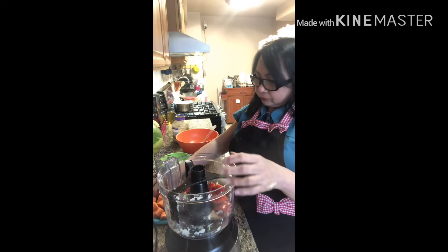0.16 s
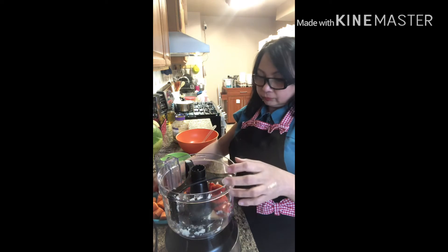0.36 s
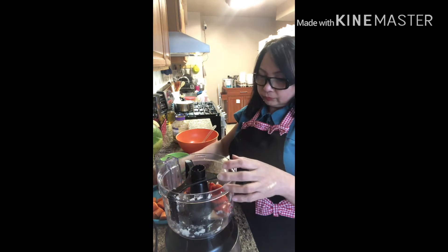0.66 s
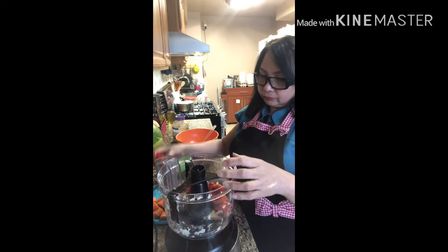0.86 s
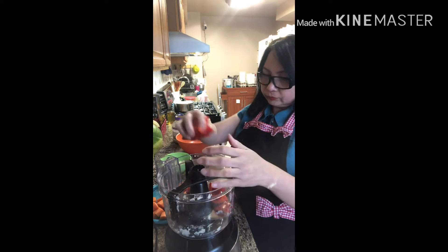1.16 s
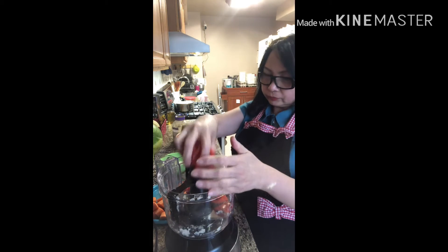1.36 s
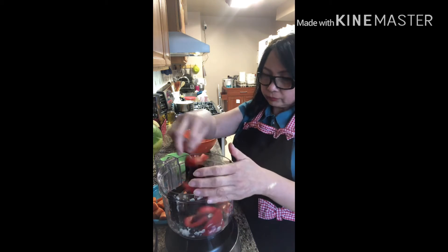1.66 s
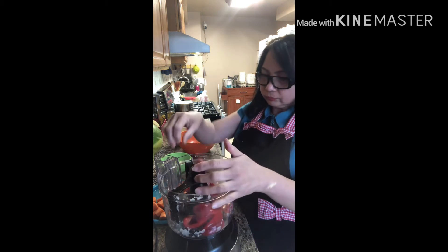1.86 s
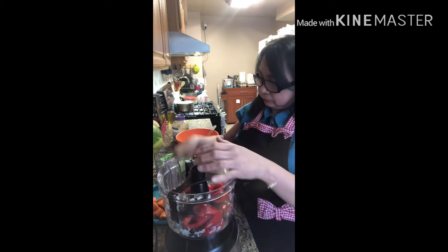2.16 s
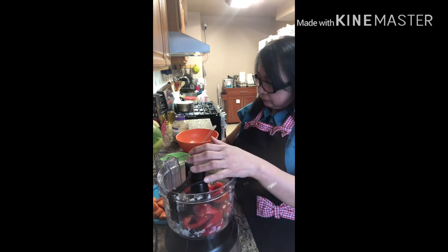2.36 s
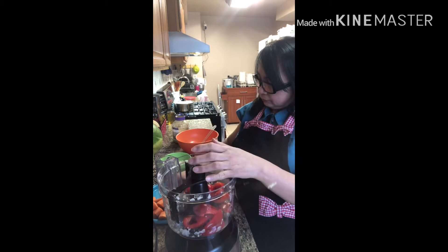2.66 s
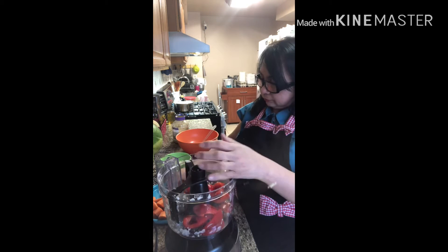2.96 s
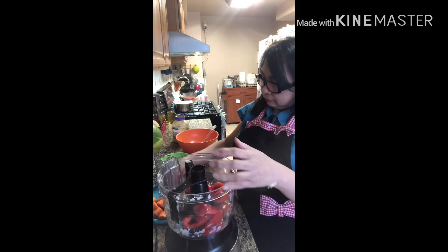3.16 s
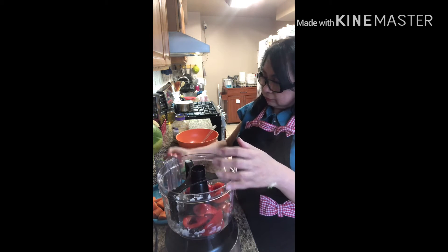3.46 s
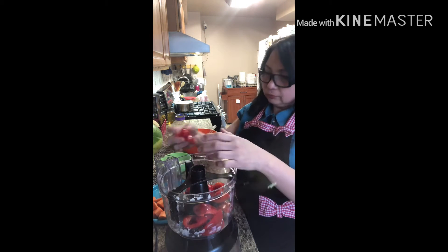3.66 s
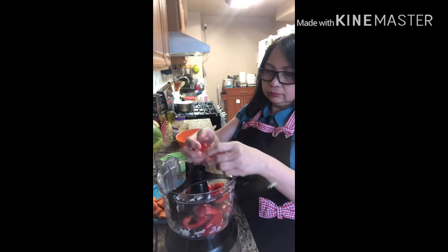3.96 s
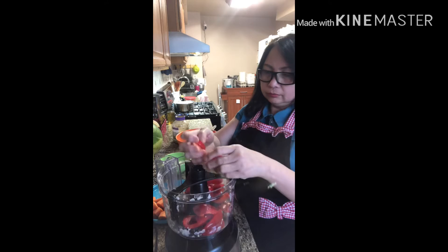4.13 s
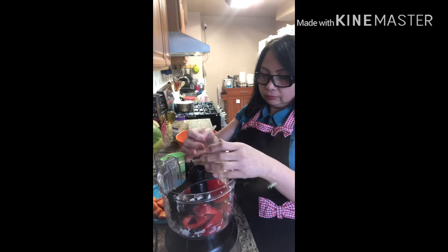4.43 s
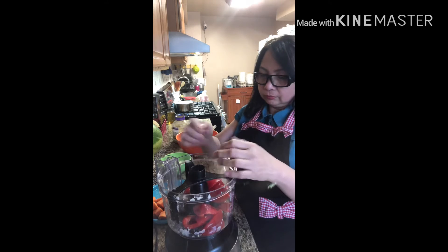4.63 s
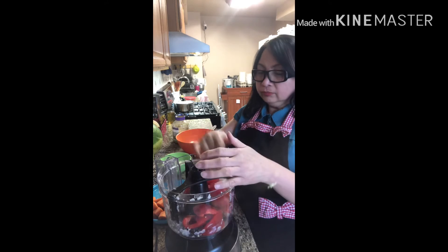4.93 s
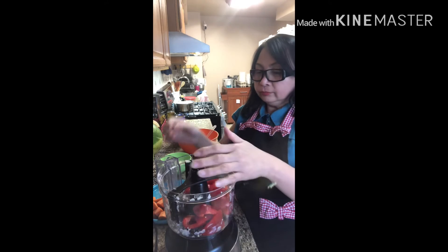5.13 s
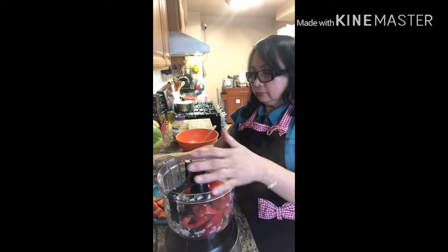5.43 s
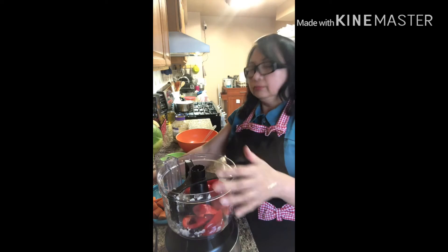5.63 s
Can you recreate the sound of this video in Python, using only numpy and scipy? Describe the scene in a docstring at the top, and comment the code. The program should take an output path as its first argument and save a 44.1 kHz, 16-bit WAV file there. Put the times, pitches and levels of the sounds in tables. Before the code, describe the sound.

Light hollow knocks of pepper landing in a plastic bowl, with soft board bumps and wet hand rustles in a small kitchen.

```python
"""Pieces of pepper dropped by hand into a plastic food processor bowl, heard close in a small kitchen.
Knocks kick the bowl's modes, with a dull slap; it rings shorter once a bed of pieces lies there.
Hands gather more from a damped board: it bumps, the worktop thuds in its low modes, crisp flesh snaps
and wet skin brushes. At the end a hand slaps the worktop. Behind are the room's short echoes, a quiet
hiss and one brief, faint tone. The microphone misses the deepest bass and is softer in the top octave."""
import sys
import numpy as np
from scipy import signal
from scipy.fft import rfft, irfft
from scipy.io import wavfile
from scipy.ndimage import uniform_filter1d

SR = 44100
rng = np.random.default_rng(int(sys.argv[2]) if len(sys.argv) > 2 else 0)


def wav_record(signal):
    """Record a signal, one row per channel, as 16-bit PCM in the file named by sys.argv[1]."""
    frames = np.transpose(np.atleast_2d(signal))
    bounded = np.clip(frames, -1, 1)
    # unit amplitude maps onto the largest positive 16-bit level
    quanta = np.round(bounded * 32767).astype(np.int16)
    wavfile.write(sys.argv[1], SR, quanta)


N = 255444

# spectrum of the background hiss: (frequency [Hz], relative density [dB])
HISS_SPECTRUM = [(15, -30), (25, -19), (49, -1), (136, -2.5), (445, -7.5), (567, -9), (631, -7),
                 (741, -16.5), (804, -13.5), (1240, -12.5), (1950, -14), (2300, -18.5), (3930, -18.5),
                 (15500, -32.5)]
# reverberation of the kitchen: (frequency [Hz], echo level [dB], t60 [s])
KITCHEN_ECHO = [(80, -5, 0.42), (262, -1, 0.24), (700, -5, 0.45), (2000, -5, 0.31), (5000, -5, 0.25),
                (11500, -5.5, 0.18)]
# spectrum of rubbing skin: (frequency [Hz], relative density [dB])
SKIN_SPECTRUM = [(180, -42), (300, -23.5), (538, -5), (675, -16), (897, -13), (2880, -9.5), (3230, -10),
                 (4000, -9), (9000, -22), (11700, -78), (19800, -120)]
# hands over board, bowl and each other:
# (time at full level [s], hold [s], friction level [dB], hump frequency [Hz], wet crackle level [dB])
HAND_STROKES = [(2.486, 0.21, -59.5, 2500, -67), (2.788, 0.016, -57, 2700, -55.5),
                (2.966, 0.043, -52.5, 2400, -58), (3.187, 0.011, -70, 2695, -85),
                (4.037, 0.012, -54.5, 3300, -65), (4.14, .22, -59.5, 3020, -62),
                (4.426, .16, -67, 2460, -64), (4.842, 0.017, -67, 2830, -72),
                (5.021, 0.053, -49, 4080, -51.5)]
# short bright ticks: pepper snapping, and the crack of the final hand slap:
# (time [s], relative tick level [dB], relative body level [dB])
BRIGHT_TICKS = [(0.4719, -36, -36.5), (1.5482, -48, -40), (1.5716, -30.5, -24), (1.6397, -28.5, -23),
                (1.704, -24, -41), (1.713, -27.5, -33), (1.761, -38, -46), (1.8437, -48, -47),
                (1.885, -52, -47), (1.9207, -37.5, -33.5), (2.0176, -50, -50), (2.369, -50, -40.5),
                (2.8297, -39.5, -41), (3.7948, -25, -38), (3.9402, -33.5, -37.5), (4.039, -24, -22.5),
                (4.146, -34.5, -35), (4.2145, -40, -44), (4.354, -48, -54), (4.944, -69, -69),
                (5.5909, -27, -26.5)]
# modes of the worktop: (frequency [Hz], relative level [dB], t60 [s])
WORKTOP_MODES = [(54, -11.5, 0.28), (76, -24, 0.56), (98, 4, 0.14), (126.3, 1.5, 0.08), (153.7, 2, 0.081),
                 (185.2, 0, 0.13), (211.9, 1.5, 0.13), (267.4, -1.5, 0.082), (307.7, 2.5, 0.04),
                 (357.7, 5.5, 0.066), (376, -1, 0.046), (476, 6, 0.03)]
# blows on the worktop: (time [s], relative level [dB], colour [Hz])
WORKTOP_THUDS = [(0.009, -28.5, 219), (0.12, -40, 126), (0.353, -52.5, 123), (0.473, -22, 266),
                 (0.513, -24, 258), (0.551, -31.5, 218), (0.585, -24, 400), (0.699, -43, 124),
                 (0.799, -46.5, 117), (0.938, -25.5, 173), (1.099, -35.5, 181), (1.176, -34, 164),
                 (1.564, -29, 185), (1.645, -22, 278), (1.687, -25, 310), (1.729, -27.5, 161),
                 (1.838, -30.5, 190), (1.927, -38.5, 200), (2.029, -33, 204), (2.22, -45.5, 117),
                 (2.391, -48.5, 178), (2.463, -36, 127), (2.507, -49, 112), (2.56, -40.5, 123),
                 (2.655, -40.5, 114), (2.769, -39, 236), (2.796, -27, 109), (2.939, -46, 128),
                 (2.983, -22, 159), (3.049, -31, 124), (3.099, -42.5, 146), (4.013, -39.5, 336),
                 (4.154, -26.5, 298), (4.189, -44, 370), (4.321, -42.5, 212), (4.434, -28, 84),
                 (4.48, -38, 203), (4.55, -44.5, 100), (4.995, -44, 108), (5.043, -37, 129),
                 (5.595, -19.5, 222), (5.676, -38, 227)]
# dull, tap and crack ranges of the board: (low edge [Hz], high edge [Hz])
BOARD_RANGES = [(350, 1035), (1300, 3430), (3800, 7800)]
# bumps of hand and pieces, in relative levels: (time [s], dull [dB], tap [dB], crack [dB], decay [ms])
BOARD_BUMPS = [(0.004, -35, -36.5, -48, 6), (0.025, -54, -41, -51.5, 24), (0.054, -50.5, -44, -62, 13.4),
               (0.474, -25, -33, -49, 4.6), (0.489, -42, -36.5, -68, 12), (0.516, -31.5, -35, -62, 4.2),
               (0.547, -40, -41.5, -52, 10.6), (0.587, -24, -66, -74, 2.8), (0.941, -37, -33.5, -67, 9.1),
               (1.101, -36, -39.5, -60, 7.6), (1.179, -34.5, -35, -68, 5.7), (2.505, -46, -60, -49, 3.9),
               (2.678, -59, -50, -58, 3.4), (2.766, -41, -36, -65, 19), (2.784, -34.5, -32.5, -54, 10.3),
               (2.935, -48, -41.5, -60, 4.7), (2.981, -28, -26, -69, 8.2), (3.05, -41, -38.5, -65, 12),
               (3.209, -76, -49, -78, 6.0), (4.017, -37, -35, -77, 9.3), (5.596, -18.5, -28, -44, 9.9)]
# modes of the plastic bowl: (frequency [Hz], relative level [dB], t60 before damping [s])
BOWL_MODES = [(555, 0, .04), (668, -2, .04), (778, -1, .05), (1000, -5, .02), (1245, 1, .02),
              (1390, -2, .015), (1680, -9, .015), (1890, -5, .04), (2024, -5, .055), (2500, -14, .012),
              (2900, -4, .015), (3110, 0, .035), (3460, -6, .012), (3960, -5, .012)]
# knocks that ring the bowl: pieces landing, and at the end a hand slapping the worktop:
# (time [s], relative level [dB], colour [Hz], relative crack level [dB], fall above colour [dB/octave])
BOWL_KNOCKS = [(1.559, -29.5, 1330, -49, -2), (1.575, -24, 2050, -42.5, 3.5),
               (1.641, -14.5, 1260, -33.5, 2), (1.651, -19, 660, -41, 12), (1.691, -25.5, 552, -48, 20),
               (1.723, -20.5, 1290, -39.5, 0), (1.815, -30, 1120, -57.5, 8.5), (1.854, -23.5, 2030, -55, 8),
               (1.937, -29.5, 1300, -55, 9.5), (2.028, -34.5, 1230, -61.5, 10),
               (2.042, -30.5, 796, -65, 19), (2.072, -45, 3100, -65, 22), (2.118, -49, 1150, -66, 17),
               (2.221, -50, 2024, -83, 10), (4.112, -28.5, 1880, -63, 10), (4.121, -19, 3050, -47.5, 0),
               (4.148, -37.5, 3100, -54, 10), (4.427, -44.5, 3100, -56.5, -12),
               (4.437, -25.5, 1800, -72, 10), (4.482, -33.5, 550, -80, 10), (4.531, -36, 1990, -70, 12),
               (4.589, -40, 1990, -68, 17), (4.653, -45, 1980, -76, 31), (4.8, -55, 2130, -67, 2),
               (4.833, -51, 3500, -65, 7), (4.863, -44.5, 1010, -71, 20), (4.912, -43.5, 1020, -81, 18),
               (5.039, -29.5, 670, -70, 39), (5.597, -20, 1240, -40, 18), (5.604, -17.5, 1830, -60, 35)]

HISS_DB = -63.5
TONE_FROM_S, TONE_TO_S, TONE_FADE_DB_PER_S = 1.2, 1.55, 400
TONE_HZ, TONE_SAG_HZ_PER_S, TONE_DB, TONE_SWELL_DB = 265, 11, -60.5, 9.5
STROKE_RISE_DB_PER_S, STROKE_FALL_DB_PER_S = 248, 203
KNOCK_CONTACT_MS, THUD_CONTACT_MS = 3.59, 9.37
SLAP_DECAY_MS, TICK_DECAY_MS = 7.6, 3
SLAP_UNDER_DB, SLAP_PER_FALL = 7, .7   # the purer the ring, the further the slap sinks below it
FILLED_S = 3   # from here on a bed of pieces lies in the bowl
EMPTY_RING, FILLED_RING = .6, .45   # damping: share of the modes' t60 that remains
MIC_LOW_HZ, MIC_TOP_HZ, MIC_TOP_DB, STOPBAND_HZ = 51, 7900, -7.5, 16500


def from_db(db):
    """Gain of a level in dB."""
    return 10 ** (np.asarray(db) / 20)


def rms_one(x):
    """Scaled to rms 1."""
    return x / np.sqrt(np.mean(x ** 2) + 1e-20)


def filtered(x, order, hz, kind="band"):
    """Through a Butterworth filter."""
    return signal.sosfilt(signal.butter(order, hz, kind, fs=SR, output="sos"), x)


def at_hz(points, hz):
    """A table over frequency, read on a log axis."""
    points = np.array(points)
    return np.interp(np.log(np.maximum(hz, 1)), np.log(points[:, 0]), points[:, 1])


def coloured(spectrum):
    """Steady noise of a given spectrum, rms 1."""
    hz = np.arange(N // 2 + 1) * SR / N
    return rms_one(irfft(rfft(rng.standard_normal(N)) * from_db(at_hz(spectrum, hz)), N))


def held(start_s, hold_s, rise_db_per_s, fall_db_per_s):
    """Envelope in dB: a straight rise, a hold at 0 dB, a straight fall."""
    since = np.arange(N) / SR - start_s
    return -rise_db_per_s * np.maximum(-since, 0) - fall_db_per_s * np.maximum(since - hold_s, 0)


def puffs(times, db, decay_ms, range_hz, size=3000):
    """One burst of band noise per contact, swelling quickly and dying."""
    out, ms = np.zeros(N), np.arange(size) * 1000 / SR
    for s, gain, decay in np.broadcast(times, from_db(db), decay_ms):
        envelope = (1 - np.exp(-ms / (0.28 * decay))) * np.exp(-ms / decay)
        burst = gain * envelope * rng.standard_normal(size)
        start = round(s * SR)
        out[start:start + size] += burst[:N - start]
    return filtered(out, 2, range_hz) * np.sqrt(SR / 2 / np.ptp(range_hz))


def struck(modes, times, db, colour_hz, contact_ms, fall_below, fall_above, spread_db):
    """Each mode is kicked at some moment of the contact, less so per octave away from the colour."""
    shape = (len(times), len(modes))
    chance_db, sign = rng.normal(0, spread_db, shape), rng.choice([-1, 1], shape)
    kick_at = np.round((times[:, None] + rng.random(shape) * contact_ms / 1000) * SR).astype(int)
    out = np.zeros(N)
    for k, (hz, mode_db, t60) in enumerate(modes):
        octaves = np.log2(hz / colour_hz)
        fall_db = np.where(octaves > 0, fall_above, -fall_below) * octaves
        drive = np.full(N, 1e-18)
        drive[kick_at[:, k]] = sign[:, k] * from_db(db + mode_db + chance_db[:, k] - fall_db)
        radius, angle = from_db(-60 / (t60 * SR)), 2 * np.pi * hz / SR
        ringing = signal.lfilter([0, np.sin(angle)], [1, -2 * radius * np.cos(angle), radius ** 2], drive)
        out += filtered(ringing, 1, [hz / 1.8, hz * 1.8])   # soft flesh: swells over a cycle or two
    return out


def hiss():
    """The quiet, steady noise floor behind everything."""
    return from_db(HISS_DB) * coloured(HISS_SPECTRUM)


def faint_tone():
    """A background sine that sinks a little in pitch and swells just before it ends."""
    since = np.arange(N) / SR - TONE_FROM_S
    length_s = TONE_TO_S - TONE_FROM_S
    swell_db = TONE_SWELL_DB * np.clip(since / length_s, 0, 1) ** 4
    fade_db = held(TONE_FROM_S, length_s, TONE_FADE_DB_PER_S, TONE_FADE_DB_PER_S)
    phase = 2 * np.pi * np.cumsum(TONE_HZ - TONE_SAG_HZ_PER_S * since) / SR
    return from_db(TONE_DB + swell_db + fade_db) * np.sqrt(2) * np.sin(phase)


def kitchen(near, size=32768, onset_s=0.016):
    """Diffuse echoes of the small room: octave bands of noise, each dying at its own rate."""
    t, tail = np.arange(size) / SR, 0
    t60_points = np.array(KITCHEN_ECHO)[:, ::2]
    for low_hz in 40 * 2. ** np.arange(9):
        band = filtered(rng.standard_normal(size), 2, [low_hz, 2 * low_hz])
        tail = tail + band * from_db(-60 * t / at_hz(t60_points, low_hz * np.sqrt(2)))
    # many overlapping room modes: no range of pitches stands out
    spectrum = rfft(tail)
    even = spectrum / np.sqrt(uniform_filter1d(np.abs(spectrum) ** 2, size=45))
    hz = np.arange(len(even)) * SR / size
    tail = irfft(even * from_db(at_hz(KITCHEN_ECHO, hz)), size) * np.clip(t / onset_s, 0, 1)
    return signal.fftconvolve(near, tail[:size // 2])[:N]


def hand_brushing(grains_per_s=3000):
    """Friction noise, a hump where the hollow of the hand resounds, and the fine crackle of wet skin."""
    out, friction = np.zeros(N), coloured(SKIN_SPECTRUM)
    grains = (rng.random(N) < grains_per_s / SR) * rng.standard_normal(N)
    grains *= from_db(1.73 * rng.exponential(1, N))   # a few stand out
    crackle = rms_one(filtered(grains, 3, 8000, "high"))
    for s, hold_s, db, hump_hz, crackle_db in HAND_STROKES:
        hump = filtered(friction, 2, [hump_hz / 1.1, hump_hz * 1.14])
        stroke = from_db(held(s, hold_s, STROKE_RISE_DB_PER_S, STROKE_FALL_DB_PER_S))
        out += stroke * (from_db(db) * (friction + 0.99 * hump) + from_db(crackle_db) * crackle)
    return out


def bright_ticks():
    """Pepper snapping, and the crack of the final hand slap: a thin tick over a lower body."""
    times, tick_db, body_db = np.transpose(BRIGHT_TICKS)
    tick = puffs(times, tick_db + 1.5, TICK_DECAY_MS, (4500, 16000))
    body = puffs(times, body_db - 1.0, TICK_DECAY_MS, (1800, 4500))
    return tick + body


def worktop_thuds():
    """Soft blows into the low modes of the worktop under the bowl."""
    times, db, colour_hz = np.transpose(WORKTOP_THUDS)
    return struck(WORKTOP_MODES, times, db - 8.5, colour_hz, THUD_CONTACT_MS,
                  fall_below=6.5, fall_above=6.5, spread_db=2.0)


def board_bumps():
    """The board's modes are too dense and damped to ring: noise that dies at once."""
    times, *levels_db, decay_ms = np.transpose(BOARD_BUMPS)
    return sum(puffs(times, db + trim_db, decay_ms, range_hz)
               for db, trim_db, range_hz in zip(levels_db, (-4, -4, 0), BOARD_RANGES))


def bowl_knocks():
    """Landing pieces, and last a hand on the worktop, ring the bowl, with a dull slap and a bright crack."""
    times, db, colour_hz, crack_db, fall_above = np.transpose(BOWL_KNOCKS)
    fall_below = np.maximum(fall_above, 7.0)   # singling out one mode spares its lower neighbours too
    ring = np.zeros(N)
    for share, rows in ((EMPTY_RING, times < FILLED_S), (FILLED_RING, times >= FILLED_S)):
        damped = [(hz, mode_db, share * t60) for hz, mode_db, t60 in BOWL_MODES]
        ring += struck(damped, times[rows], db[rows] - 2.5, colour_hz[rows], KNOCK_CONTACT_MS,
                       fall_below[rows], fall_above[rows], spread_db=5.0)
    slap = puffs(times, db - SLAP_UNDER_DB - SLAP_PER_FALL * fall_above, SLAP_DECAY_MS, (500, 2500))
    crack = puffs(times, crack_db + 11, KNOCK_CONTACT_MS, (3800, 8000))
    return ring + slap + crack


def scene():
    """One microphone near the bowl: the close sounds, their echoes and the background."""
    near = bowl_knocks() + board_bumps() + worktop_thuds() + bright_ticks() + hand_brushing()
    # the microphone is deaf to the deepest bass and steps down in the top octave
    near = filtered(near, 3, MIC_LOW_HZ, "high")
    below_top = filtered(near, 2, MIC_TOP_HZ, "low")
    near = below_top + from_db(MIC_TOP_DB) * (near - below_top)
    return (near + kitchen(near) + faint_tone() + hiss())[None]


def record(dry):
    """A steep low-pass cuts the very top."""
    return signal.sosfilt(signal.cheby2(14, 60, STOPBAND_HZ, fs=SR, output="sos"), dry)


dry = scene()
out = record(dry)
wav_record(out)
```